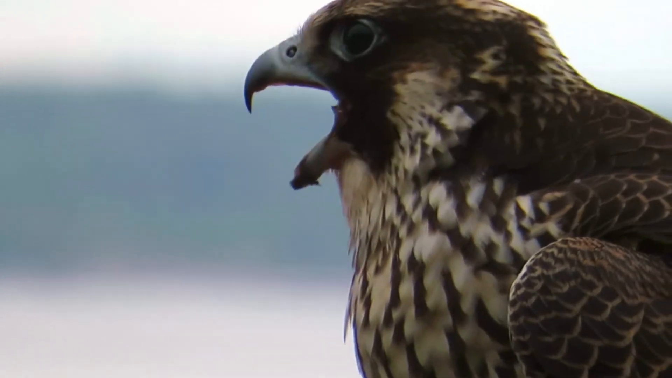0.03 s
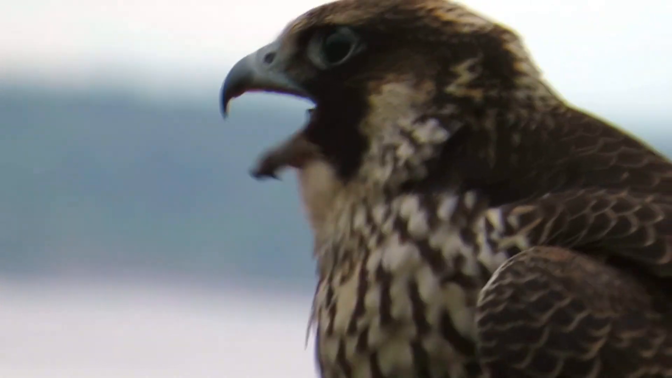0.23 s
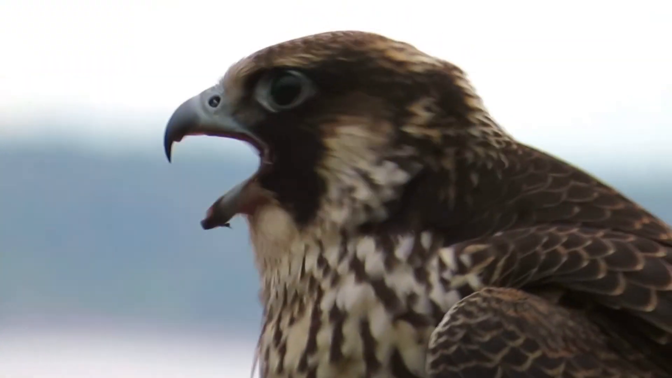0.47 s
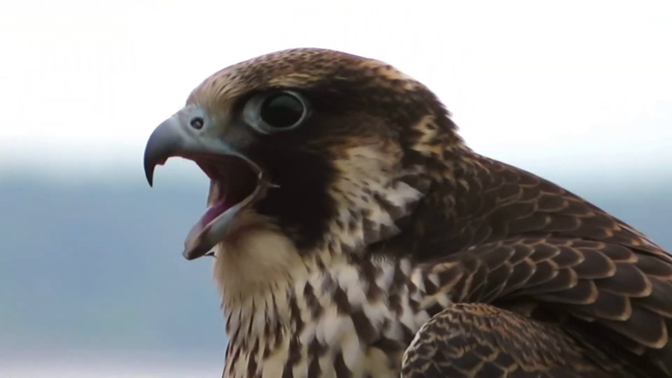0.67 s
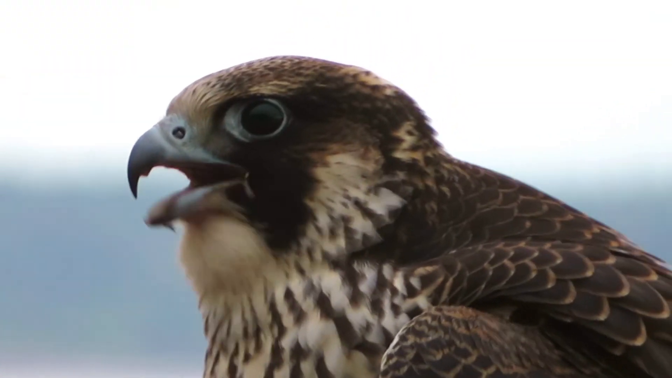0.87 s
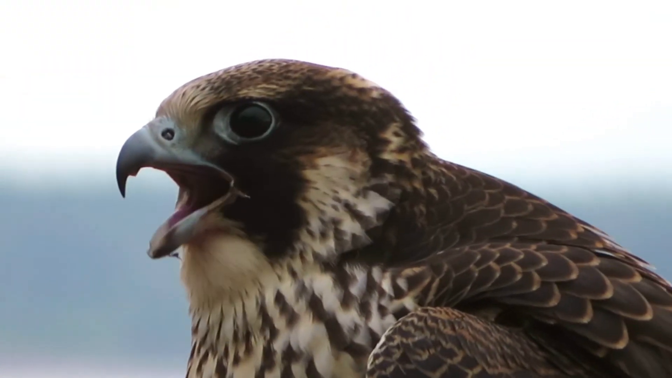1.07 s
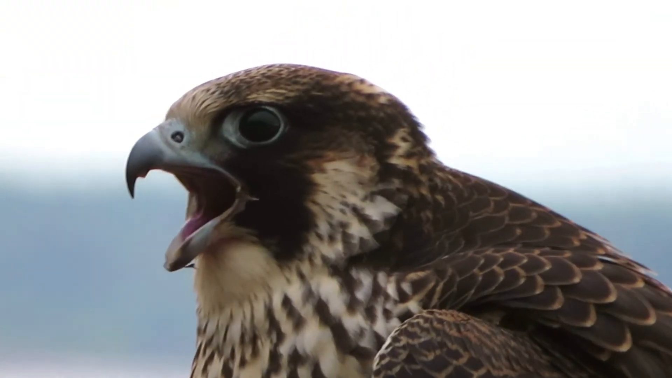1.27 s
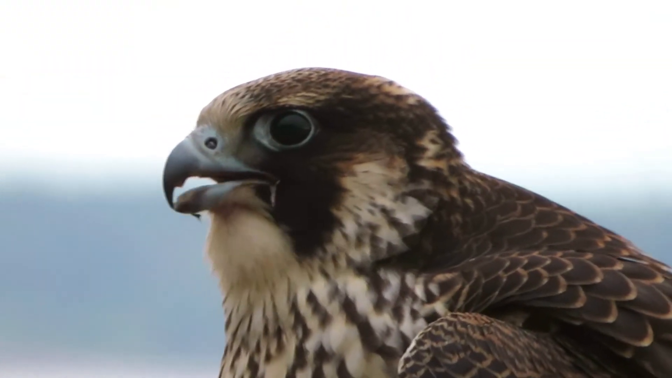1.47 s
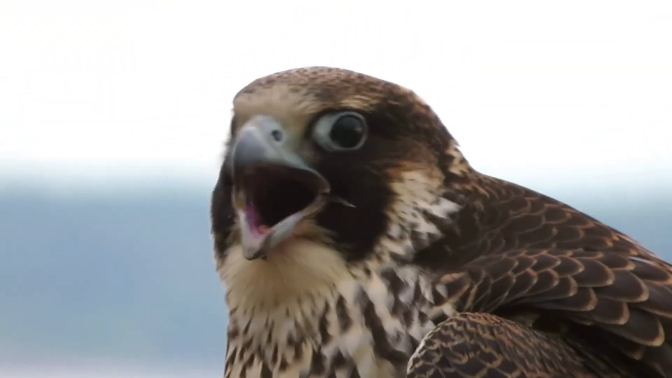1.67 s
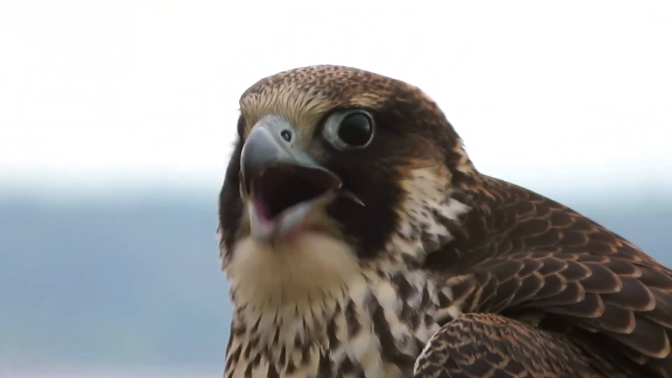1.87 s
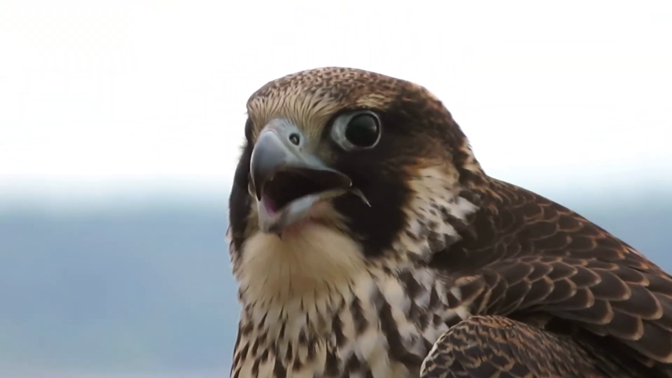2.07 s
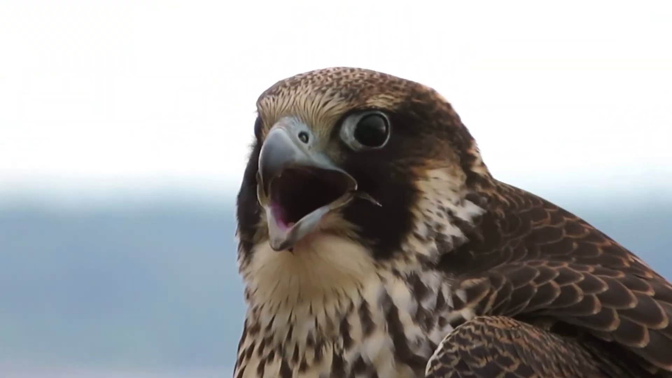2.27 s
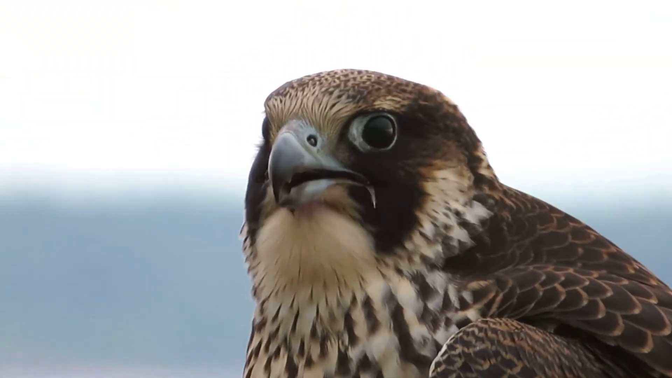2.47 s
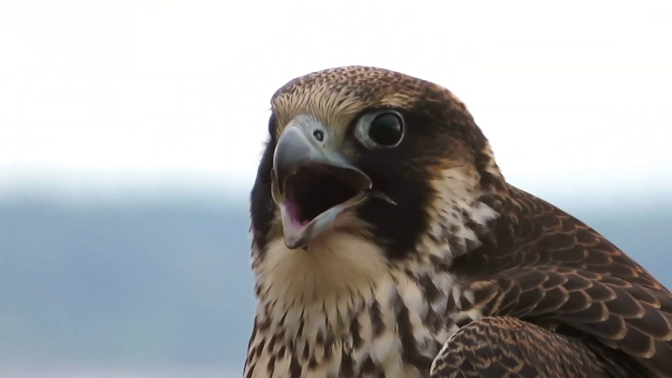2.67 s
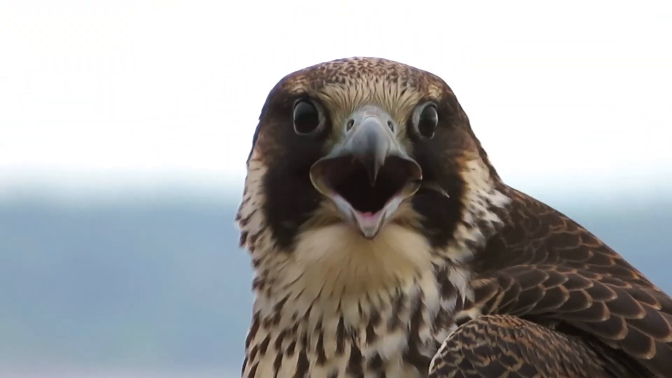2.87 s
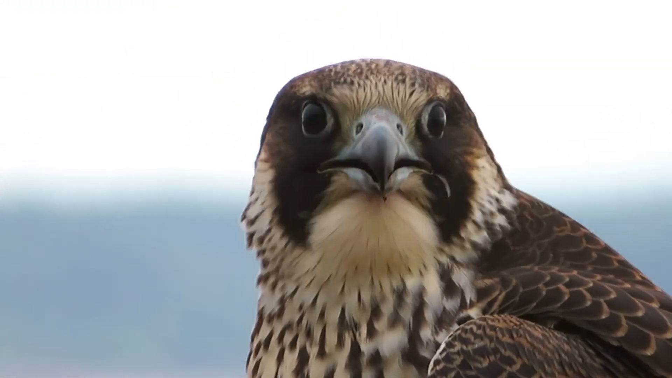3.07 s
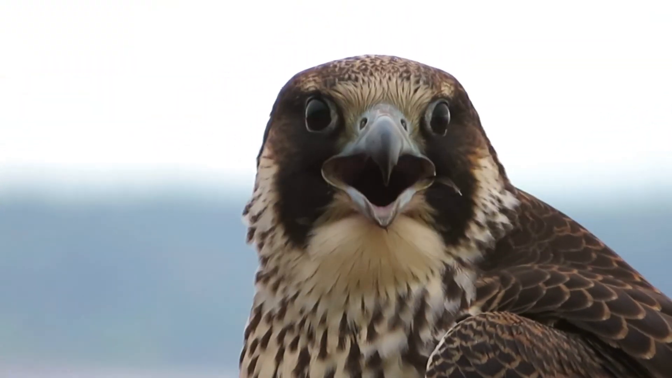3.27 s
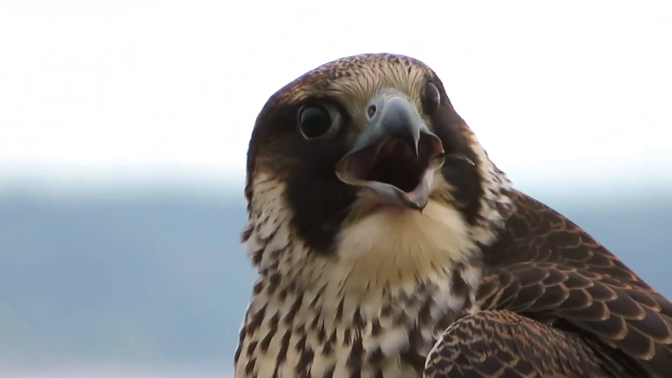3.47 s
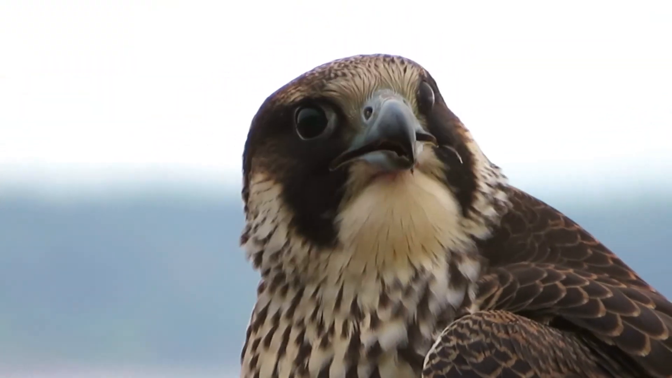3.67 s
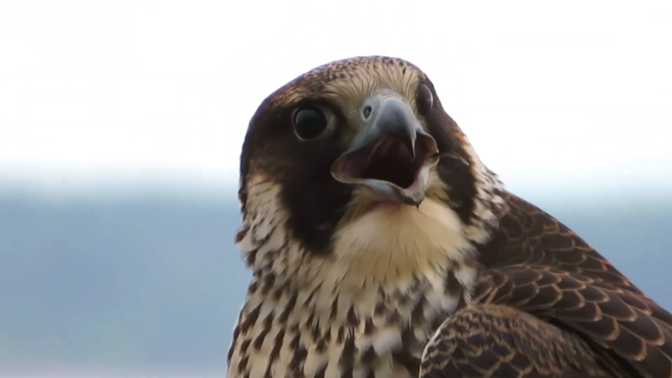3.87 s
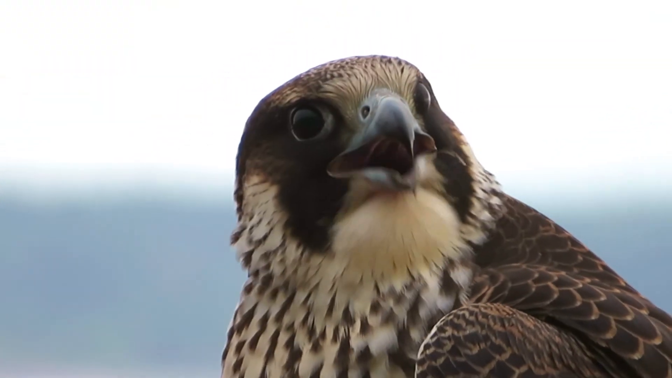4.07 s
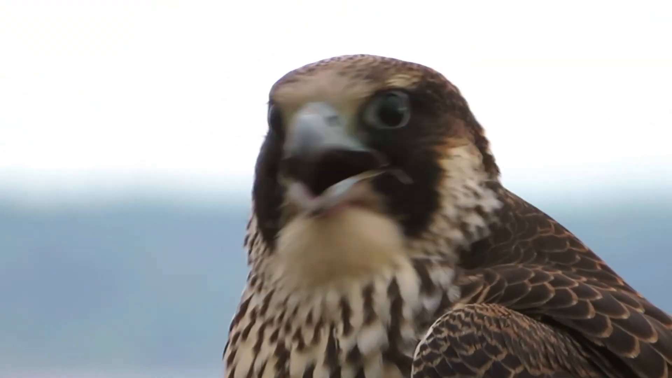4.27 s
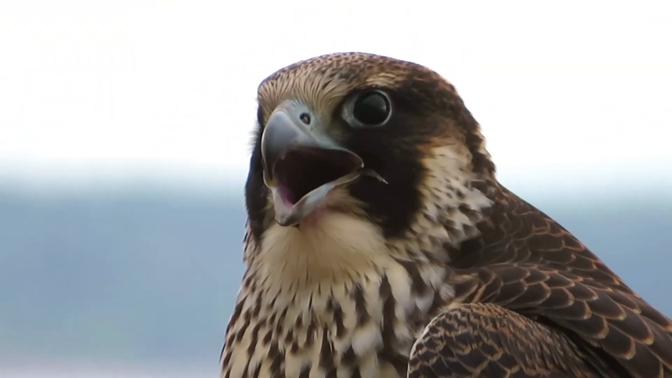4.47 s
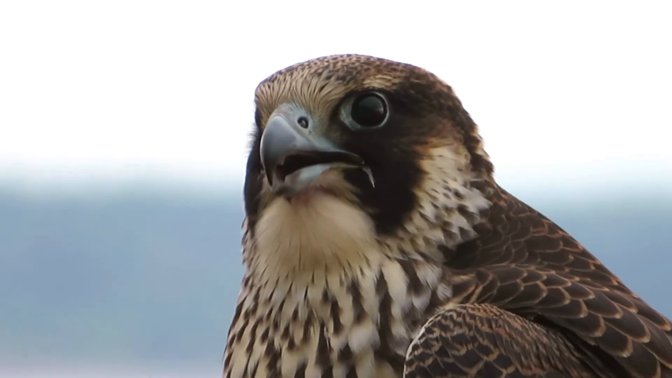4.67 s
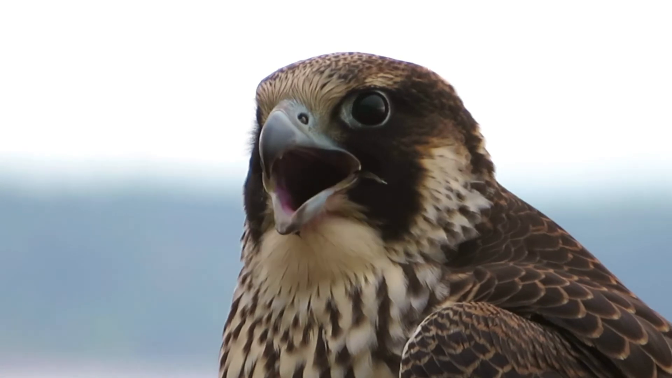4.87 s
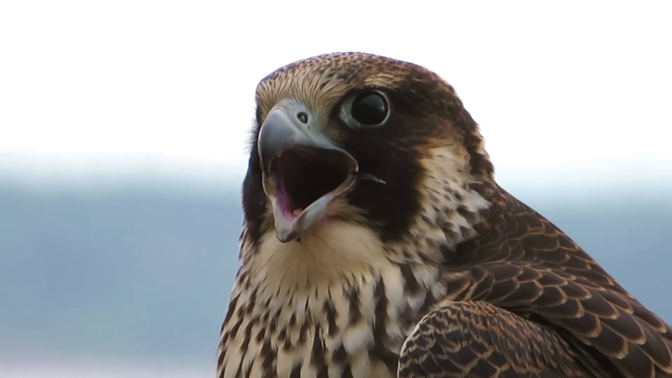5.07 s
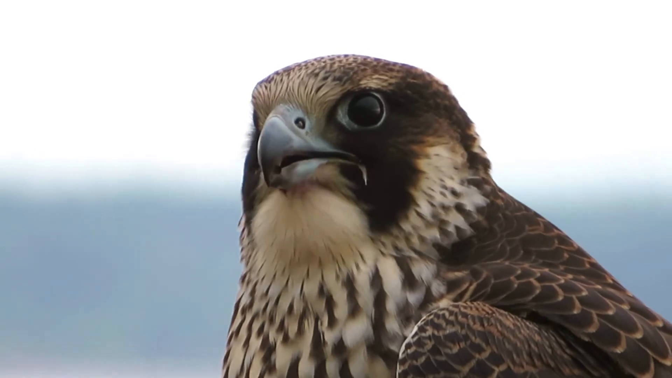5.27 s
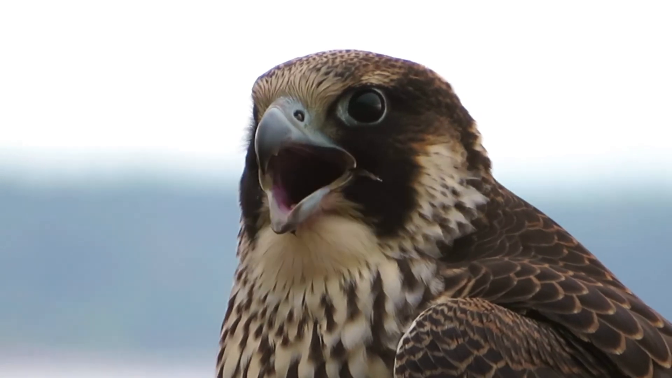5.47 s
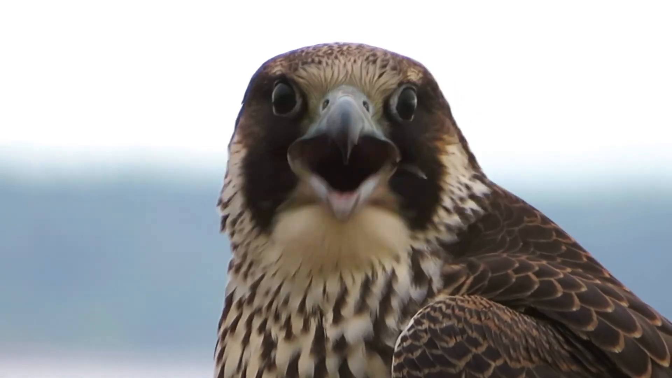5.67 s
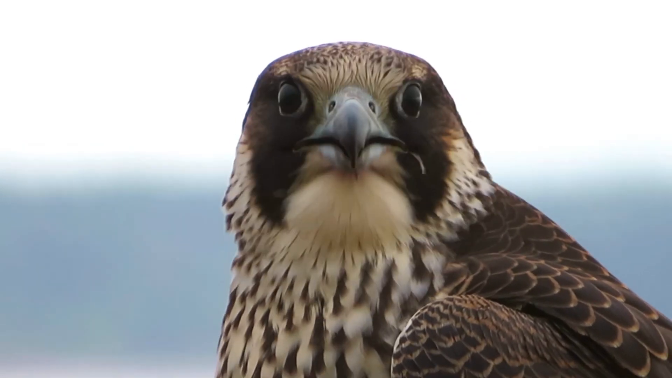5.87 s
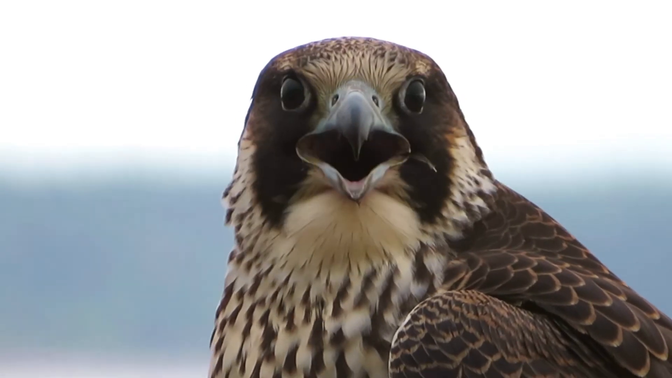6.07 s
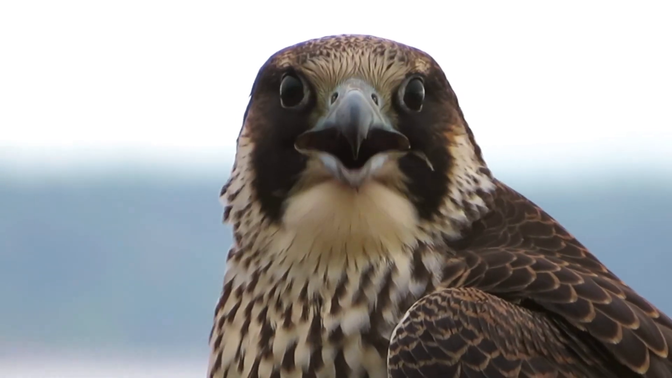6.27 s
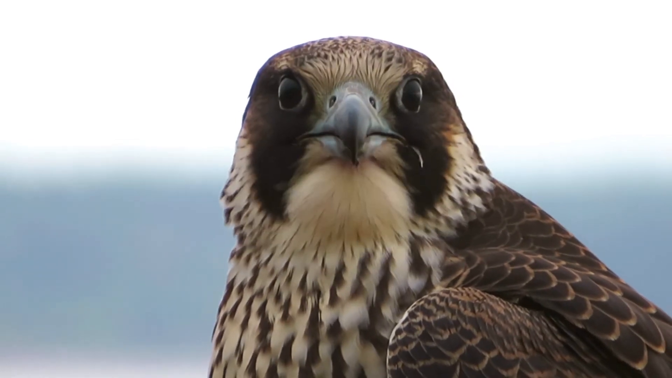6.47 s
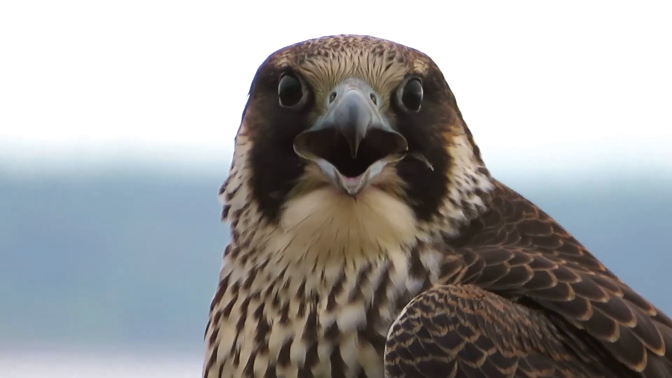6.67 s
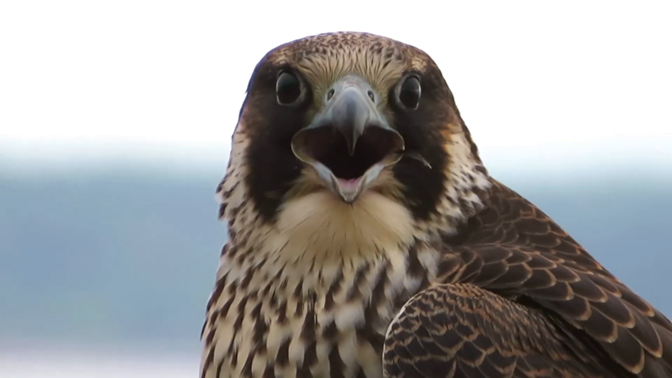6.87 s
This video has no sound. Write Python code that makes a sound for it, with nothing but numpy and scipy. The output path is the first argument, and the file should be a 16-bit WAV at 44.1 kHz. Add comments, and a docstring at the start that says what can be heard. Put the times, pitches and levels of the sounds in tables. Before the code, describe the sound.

A young falcon is already screaming close to the microphone at the start, in open air. It gives thirteen harsh, high calls in about seven seconds, evenly spaced, each lasting roughly 0.4 seconds with a short gap after it. Every call warbles four to six times, the pitch dipping to a loud, clearer throb and climbing to a weaker, raspy crest. Short, dull echoes trail the cries. At about 0.4 seconds, near the end of the first call, two small knocks sound, the first lower, the second a higher tick. A faint, distant hiss continues throughout. Low wind touches the microphone lightly around 2.5 and 4.6 seconds, then buffets it more strongly between 5.4 and 6.2 seconds. The falcon keeps the same pace and nearly the same strength, its last call running from about 6.6 seconds to the end.

```python
"""A young falcon screams close by, thirteen times, in the open. Each call warbles: the pitch dips to a
loud, clear throb and climbs to a weaker crest, made harsh by a slow flutter of the syrinx that
modulates phase and amplitude. Two small knocks sound near the end of the first call. Perch and ground
return short echoes; below lie a far hiss and wind on the microphone, which buffets most near the end."""
import sys
import numpy as np
from scipy import signal
from scipy.fft import rfft, irfft, next_fast_len
from scipy.io import wavfile
from scipy.ndimage import uniform_filter1d

SR = 44100
rng = np.random.default_rng(int(sys.argv[2]) if len(sys.argv) > 2 else 0)


def transcribe(signal):
    """Save signal, clipped to [-1, 1], as a 16-bit WAV file at the path in sys.argv[1]."""
    frames = np.atleast_2d(signal).T
    limited = np.clip(frames, -1, 1)
    pcm = np.round(limited * 32767).astype(np.int16)
    wavfile.write(sys.argv[1], SR, pcm)


N = 304731
CUTOFF_HZ = 15700


def from_db(db):
    """Decibels to amplitude ratio."""
    return 10 ** (np.asarray(db) / 20)


def rms_one(x):
    """Normalisation to unit rms."""
    return x / np.sqrt(np.mean(x ** 2) + 1e-20)


def at_hz(points, hz):
    """Interpolation of (Hz, value) points over log frequency."""
    return np.interp(np.log(np.maximum(hz, 1)), np.log(np.array(points)[:, 0]), np.array(points)[:, 1])


def drift(rate_hz):
    """Random fluctuation of unit rms: white noise through two one-pole low-passes."""
    r = np.exp(-2 * np.pi * rate_hz / SR)
    return rms_one(signal.lfilter([1], [1, -2 * r, r * r], rng.standard_normal(N + SR))[SR:])


def coloured(x, spectrum):
    """Zero-phase filtering by a curve of (Hz, dB) points."""
    size = next_fast_len(N + 4096)
    gain = from_db(at_hz(spectrum, np.arange(size // 2 + 1) * SR / size))
    return irfft(rfft(x, size) * gain, size)[..., :N]


def resonance(x, hz, width_hz):
    """A damped resonator: a two-pole band-pass."""
    r = np.exp(-np.pi * width_hz / SR)
    gain = (1 - r * r) / 2
    return signal.lfilter([gain, 0, -gain], [1, -2 * r * np.cos(2 * np.pi * hz / SR), r * r], x)


def evened(x, seconds):
    """Division by the running rms removes slow changes of level."""
    size = int(seconds * SR)
    return x / np.sqrt(uniform_filter1d(uniform_filter1d(x ** 2, size), size) + 1e-9)


def plateau(t, start, end, rise_s, fall_s):
    """A soft gate that opens at start and closes at end."""
    return (1 + np.tanh((t - start) / rise_s)) * (1 - np.tanh((t - end) / fall_s)) / 4


def hiss():
    """Partial coherence: far noise whose mid-to-side ratio makes the channels most alike in the bass."""
    # Each row: frequency in Hz, relative spectral density in dB.
    spectrum = [(59, -32), (100, -5.5), (438, -8), (727, -11.5), (791, -9.5), (861, -10.5), (2320, -14),
                (15500, -36.5)]
    # Each row: frequency in Hz, left-right correlation.
    likeness = [(100, 0.79), (300, 0.042), (1400, 0.51), (15000, 0.072)]
    mid, side = coloured(rng.standard_normal((2, N)), spectrum)
    mid = coloured(mid, [(hz, 10 * np.log10(1 + c)) for hz, c in likeness])
    side = coloured(side, [(hz, 10 * np.log10(1 - c)) for hz, c in likeness])
    return from_db(-50.5) * rms_one(mid + side * [[1], [-1]])


def wind():
    """Turbulence: lumpy pressure on the microphone ports, stronger on the left, with brief buffets."""
    # Each row: time in seconds, mean breeze level in dB.
    breeze_levels = [(0, -61), (4.3, -60.5), (5.1, -53.5), (5.9, -41.5), (6.4, -60)]
    # Each row: start of a buffet in seconds, peak level in dB.
    gusts = [(2.393, -47), (2.72, -48), (4.603, -44), (5.389, -31.5), (5.577, -41), (5.754, -50),
             (5.94, -26), (6.135, -30), (6.656, -40)]
    # Each row: frequency in Hz, relative spectral density in dB.
    spectrum = [(12, -41), (20, 4.5), (43, 4.5), (78, -0.5), (253, -24.5), (300, -38), (390, -65),
                (660, -120)]
    t = np.arange(N) / SR
    times, level_db = np.transpose(breeze_levels)
    breeze = from_db(np.interp(t, times, level_db) + 5.3 * drift(3))
    buffets = sum(from_db(db) * np.exp(-((t - start - .03) / .015) ** 2) for start, db in gusts)
    mid, side = rms_one(coloured(rng.standard_normal((2, N)), spectrum))
    return (breeze + buffets) * (mid * from_db([[1.3], [-1.3]]) + .21 * side * [[1], [-1]])


def open_air(sound):
    """Reflection adds dull echoes and a thin tail from far trees; the two ports differ in colour."""
    # Each row: delay in seconds, level in dB before the low-pass, leftward bias.
    echoes = [(0.037, -15, 0.17), (0.066, -35, 0.025), (0.136, -39, -.1)]
    # Each row: frequency in Hz, level of side relative to mid in dB.
    port_difference = [(900, -83), (1500, -51), (2400, -21.5), (4400, -13), (8000, -16), (15000, -9.5)]
    tail_t60_s, tail_db = 1, -36
    t = np.arange(int(tail_t60_s * SR)) / SR
    tail = from_db(tail_db - 60 * t / tail_t60_s) * (t > .02) / np.sqrt(.082 * SR)
    response = tail * rng.standard_normal((2, len(t)))
    for delay_s, level_db, left in echoes:
        smear = np.exp(-((t - delay_s) / .01) ** 2) * rng.standard_normal(len(t))  # uneven ground
        response += from_db(level_db) * np.outer([1 + left, 1 - left], smear / np.linalg.norm(smear))
    dull = signal.sosfilt(signal.butter(2, 4000, fs=SR, output="sos"), sound)
    scatter = rng.standard_normal(800) * np.exp(-np.arange(800) / 160)
    side = coloured(signal.fftconvolve(sound, scatter / np.linalg.norm(scatter))[:N], port_difference)
    return sound + side * [[1], [-1]] + signal.fftconvolve(dull[None], response, axes=1)[:, :N]


def knocks():
    """Damped free vibration: each small knock nearby is one decaying sinusoid."""
    # Each row: start in seconds, peak level in dB, frequency in Hz, time to fall 60 dB in seconds.
    rings = [(0.358, -30.5, 415, 0.062), (0.44, -36.5, 1500, 0.017)]
    t = np.arange(N) / SR
    sound = np.zeros(N)
    for start, db, hz, t60 in rings:
        age = np.maximum(t - start, 0)
        sound += from_db(db - 60 * age / t60) * np.sin(2 * np.pi * hz * age)
    return sound


def syrinx_gestures():
    """Muscular control of the folds: pitch, levels and roughness swing between crest and throb."""
    # Each row: start and end in seconds, base crest levels of partials 1 and 2 in dB,
    # base roughness of the first crest from 0 to 1, top-octave gain in dB as the head turns.
    calls = [(-.05, 0.365, -32, -23, .49, -6.5), (0.492, .967, -29.5, -22.5, 0.17, -2),
             (1.091, 1.502, -30.5, -22, 0.31, -1.5), (1.629, 2.022, -29, -21.5, 0.25, 1),
             (2.152, 2.531, -28, -22, 0.07, 1), (2.672, 3.058, -28.5, -22.5, 0.37, 1),
             (3.206, 3.663, -27.5, -23, 0.31, 1), (3.822, 4.197, -28.5, -23, 0.08, -0.5),
             (4.35, 4.748, -29, -24, 0.4, 0.5), (4.872, 5.275, -31.5, -23.5, 0.19, 1),
             (5.432, 5.83, -29.5, -21.5, 0.23, 0.5), (5.999, 6.398, -29.5, -24, 0.21, 1.5),
             (6.612, 7, -28.5, -25, 0.17, 1.5)]
    # Each row: centre and length in seconds, pitch in Hz, level of partial 2 in dB,
    # base roughness from 0 to 1.
    throbs = [(0.064, 0.031, 1185, -18.5, 0.48), (0.144, 0.024, 1233, -17.5, 0.63),
              (0.216, .032, 1212, -17.5, 0.4), (0.297, 0.025, 1251, -15, 0.12),
              (.53, 0.033, 1117, -16.5, 0.02), (0.593, 0.024, 1137, -15.5, 0.11),
              (0.661, .036, 1158, -13.5, 0.18), (0.74, 0.031, 1159, -11.5, 0.08),
              (0.818, 0.023, 1194, -13, 0.1), (0.899, .035, 1168, -12.5, .05),
              (1.129, 0.028, 1102, -14.5, 0.15), (1.201, 0.033, 1130, -12, 0),
              (1.265, 0.03, 1156, -14.5, 0.34), (1.345, 0.034, 1191, -16, 0.48),
              (1.425, 0.031, 1170, -12.5, 0.01), (1.667, 0.03, 1088, -16.5, 0.14),
              (1.733, 0.042, 1150, -14, 0.05), (1.802, 0.047, 1224, -18, 0.25),
              (1.871, .035, 1179, -12, 0.11), (1.949, 0.019, 1184, -11.5, 0.28),
              (2.196, 0.036, 1089, -15, .07), (2.288, 0.0075, 1281, -16.5, 0.26),
              (2.331, 0.019, 1173, -16, 0.08), (2.399, 0.025, 1191, -15.5, 0.03),
              (2.477, 0.027, 1154, -13, 0.08), (2.719, .04, 1097, -14.5, 0.05),
              (2.773, .036, 1180, -17, 0.15), (2.845, 0.037, 1149, -12, 0.09), (2.919, 0.037, 1153, -11, 0),
              (3.003, .022, 1136, -13, 0.18), (3.253, 0.038, 1066, -17, 0.04),
              (3.321, 0.035, 1095, -15, 0.03), (3.384, 0.03, 1102, -14, 0.05),
              (3.457, 0.028, 1293, -17.5, 0.1), (3.538, .02, 1291, -16.5, 0.06),
              (3.622, 0.038, 1276, -19.5, 0.4), (3.868, 0.032, 1046, -19.5, 0.08),
              (3.929, 0.034, 1104, -18, 0.07), (3.992, 0.019, 1239, -22, 0.42),
              (4.063, 0.029, 1229, -20, 0.41), (4.136, 0.031, 1244, -19.5, 0.74),
              (4.392, 0.037, 1066, -17, 0.16), (4.452, 0.031, 1074, -16.5, 0.13),
              (4.526, .029, 1116, -15, .14), (4.596, 0.024, 1102, -15.5, 0.25),
              (4.682, 0.018, 1222, -20.5, 0.68), (4.919, 0.037, 1076, -15.5, 0.07),
              (4.985, .034, 1109, -12.9, 0.01), (5.058, 0.036, 1145, -11.5, .13),
              (5.13, 0.029, 1163, -12, 0.12), (5.212, .024, 1162, -11, 0.07),
              (5.483, 0.039, 1088, -16.5, 0.07), (5.543, 0.029, 1167, -14.5, 0.01),
              (5.611, 0.019, 1168, -12.5, 0.1), (5.692, 0.021, 1247, -14.5, 0.36),
              (5.766, 0.024, 1209, -14, 0.37), (6.043, 0.029, 1048, -19, 0.06),
              (6.106, 0.024, 1078, -15.5, 0.03), (6.18, 0.02, 1096, -13.5, 0),
              (6.251, 0.019, 1099, -14, 0.06), (6.327, .016, 1197, -17.5, 0.6),
              (6.633, 0.028, 1222, -30.5, 0.09), (6.704, 0.032, 1105, -18, 0.05),
              (6.774, 0.024, 1124, -15.5, 0.04), (6.846, .026, 1108, -16, 0.3)]
    start_hz, crest_hz, stop_hz, shallow_hz = 1093, 1303.3, 1015.4, 1227
    opening_db, sag_db_per_s, early_rough, late_rough = -28.5, 11, .4, .48
    attack_s, attack_db_per_s, release_s, release_db_per_s = .024, 1794, .013, 2500
    controls = np.zeros((6, N)) + [[stop_hz], [-99], [-99], [-99], [0], [0]]
    for start, end, first_crest_db, second_crest_db, opening_rough, facing_db in calls:
        span = slice(max(int((start - .03) * SR), 0), min(int((end + .0268) * SR), N))
        t = np.arange(N)[span] / SR
        rows = np.array([row for row in throbs if start < row[0] < end])
        crest_times = np.append((rows[1:, 0] + rows[:-1, 0]) / 2, end - .03)
        nearest = np.minimum(np.searchsorted(crest_times, t), len(rows) - 1)
        centre, length, dip_hz, dip_db, dip_rough = rows[nearest].T

        tensing = np.clip((t - start + .0033) / attack_s, 0, 1) ** .54
        holding = plateau(t, -1, end - release_s, .01, .0048)
        fade_db = -attack_db_per_s * np.maximum(start - t, 0) - 6 * (1 - tensing)
        fade_db -= release_db_per_s * np.maximum(t - end + .0034, 0)

        # Early throbs are square, late ones round; the folds snap shut each cycle while "closed".
        fresh = np.exp(-(centre - start) / .47)
        begin, finish = centre - length / 2, centre + length / 2
        dipped = plateau(t, begin, finish, .008 - .0053 * fresh, .0085 - .00563 * fresh)
        swollen = plateau(t, begin - .002, finish + .00047, .011 - .0071 * fresh, .0105 - .008 * fresh)
        closed = plateau(t, begin + .0011, finish - .005, .0055 - .0051 * fresh, .006)
        letting_go = (t > centre) * np.exp(-np.abs(t - finish - .006) / .01115)

        crest_rough = np.where(t > start + .2, late_rough, early_rough)
        crest_rough = np.where(t < rows[1, 0], opening_rough, crest_rough) * (.892 + .582 * letting_go)
        rough = crest_rough + closed * (dip_rough - crest_rough) + .684 * (1 - tensing)
        rough = np.clip(rough, 0, 1) * (.354 + .71 * holding)
        # A crest free of flutter is slightly higher and stronger.
        clear = (t > rows[0, 0]) * np.clip(1 - crest_rough / early_rough, 0, 1) ** 2

        # Early throbs and shallow ones glide upward.
        glide_hz_per_s = 1600 * fresh + 3200 * np.clip((dip_hz - shallow_hz) / 50, 0, 1)
        low_hz = dip_hz + glide_hz_per_s * (t - centre)
        high_hz = crest_hz + 34.97 * clear
        warble_hz = high_hz + dipped * (low_hz - high_hz)
        tensed_hz = start_hz + tensing * (warble_hz - start_hz)
        pitch_hz = stop_hz + holding * (tensed_hz - stop_hz)

        crest_db = np.interp(t, [start + .013, crest_times[0]], [opening_db, second_crest_db])
        crest_db += .5 * clear - sag_db_per_s * (t - start)
        # Rough crests and deep dips are brighter.
        upper_crest_db = crest_db - 19 + 10.2 * crest_rough
        first_dip_db = -27 + .47 * (dip_db + 14) + .0248 * (dip_hz - 1150)
        upper_dip_db = -25 + .85 * (dip_db + 14) - .0306 * (dip_hz - 1150)
        first_db = first_crest_db + dipped * (first_dip_db - first_crest_db) + fade_db
        first_db -= 1.75 * crest_rough * letting_go + 14 * (1 - holding)
        second_db = crest_db + swollen * (dip_db - crest_db) + fade_db
        upper_db = upper_crest_db + closed * (upper_dip_db - upper_crest_db) + fade_db
        controls[:, span] = [pitch_hz, first_db, second_db, upper_db, rough, np.full_like(t, facing_db)]
    return uniform_filter1d(controls, int(.0031 * SR), axis=1)  # the controls change smoothly, without sudden steps


def falcon():
    """Source and filter: harmonics of the syrinx, modulated by uneven flutter, pass throat and beak."""
    # Each row: frequency in Hz, relative level of the upper partials in dB.
    beak = [(1760, -29), (3000, 9), (4590, 3), (5400, -8), (6130, -4), (7850, -10.5), (8760, -8.5),
            (9320, -14.5), (12900, -14), (14100, -21), (15500, -42)]
    # Each row: frequency in Hz, relative spectral density of the turbulent air in dB.
    breath_spectrum = [(2600, -7), (3100, 8.5), (3600, 7), (4000, 0.5), (4700, 6), (5300, -19), (6000, 3.5),
                       (7200, -12.5), (8400, -3), (9500, -22), (11000, -6), (14500, -89)]
    flutter_hz, throat_hz, throat_width_hz = 244.1, 2281, 784
    pitch_hz, first_db, second_db, upper_db, rough, facing_db = syrinx_gestures()
    flutter = 2 * np.pi * np.cumsum(flutter_hz * (1 + .08 * drift(25))) / SR
    depth = np.minimum(rough * from_db(3.8 * drift(59)), .9)
    jitter = (.00304 + .035 * rough) * drift(81.6)
    carrier = 2 * np.pi * np.cumsum(pitch_hz * (1 + jitter)) / SR
    smooth_phase = carrier + .24 * depth * np.sin(flutter)
    phase = carrier + .43 * depth * np.sin(flutter) + .25 * (rough + .021) * drift(390)
    airflow = np.exp(.69 * depth * np.cos(flutter + .69))
    falter_db = rough * drift(68)  # a rough voice wavers in strength
    rasp = .85 * rough * resonance(rng.standard_normal(N), throat_hz, throat_width_hz)

    first = evened(np.cos(smooth_phase) * airflow ** .3, .011)
    first *= from_db(first_db + 3.7 * falter_db + 1.67 * drift(26))
    throat = resonance((np.cos(2 * phase) + rasp) * airflow, throat_hz, throat_width_hz)
    second = evened(throat, .023) * from_db(second_db + 4.6 * falter_db)
    partials = sum(from_db(at_hz(beak, k * pitch_hz)) * np.cos(k * phase + k * k)
                   * (k * pitch_hz < CUTOFF_HZ) for k in range(3, 16))
    breath = rms_one(coloured(rng.standard_normal(N), breath_spectrum))
    breath *= np.clip(3.5 * rough - .05, .06, .65)
    upper = evened((evened(partials, .015) + breath) * airflow, .058) * from_db(upper_db + falter_db)
    top_octave = coloured(upper, [(5000, -40), (9000, 0)])
    hum = from_db(second_db - 24) * depth * np.sin(flutter)  # the flutter itself is faintly heard
    return first + second + upper + (from_db(facing_db) - 1) * top_octave + hum


def scene():
    """Superposition: falcon and knocks with their echoes, over hiss and wind."""
    return open_air(falcon() + knocks()) + hiss() + wind()


def record(dry):
    """Band limiting: the microphone droops in the top octave, and a steep low-pass cuts the rest."""
    drooped = signal.sosfilt(signal.butter(4, 14300, fs=SR, output="sos"), dry)
    return signal.sosfilt(signal.cheby2(12, 70, CUTOFF_HZ, fs=SR, output="sos"), drooped)


dry = scene()
out = record(dry)
transcribe(out)
```